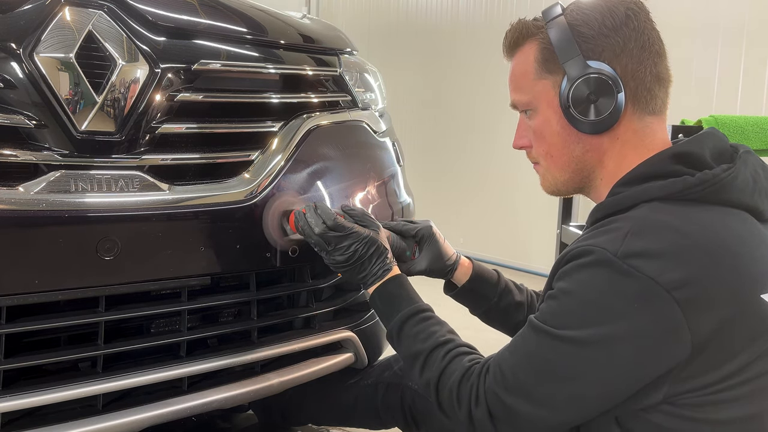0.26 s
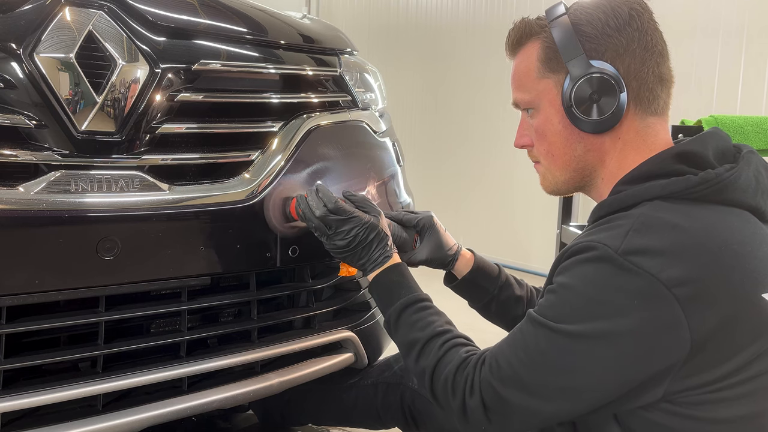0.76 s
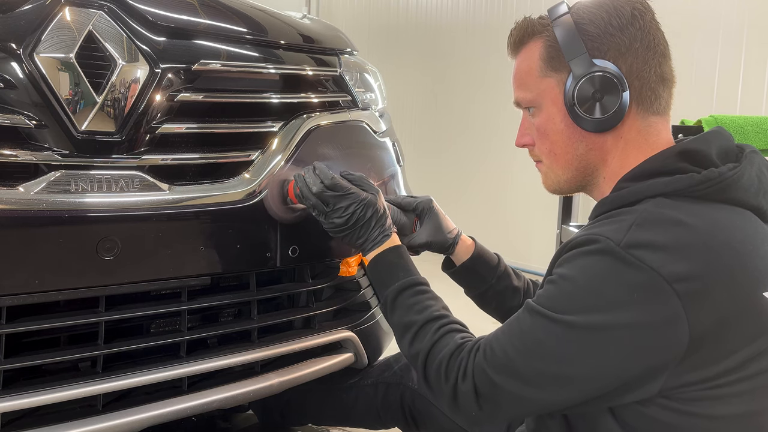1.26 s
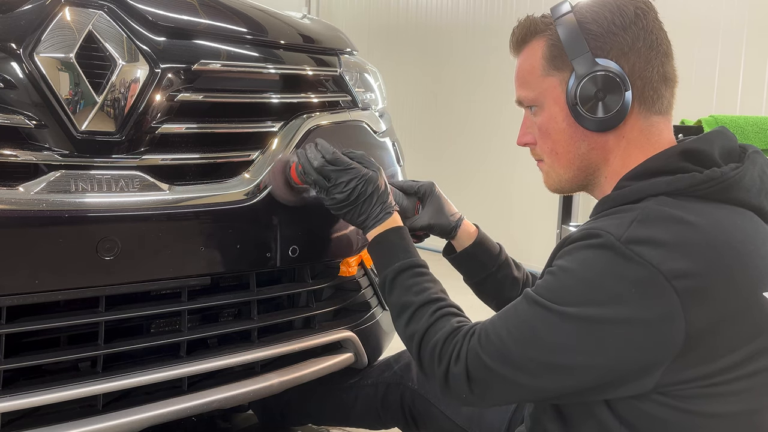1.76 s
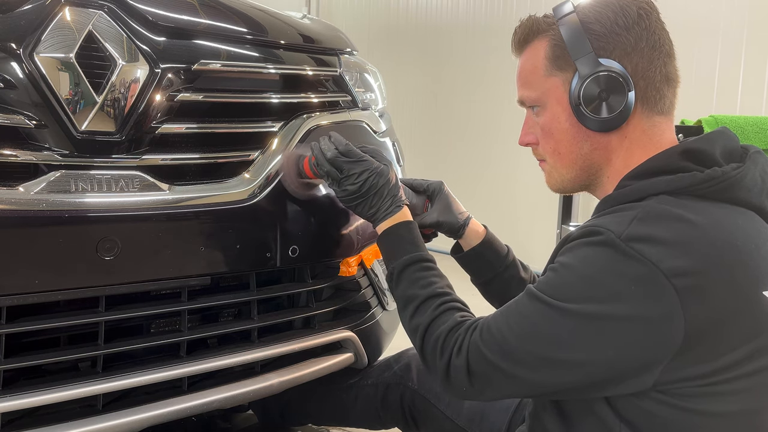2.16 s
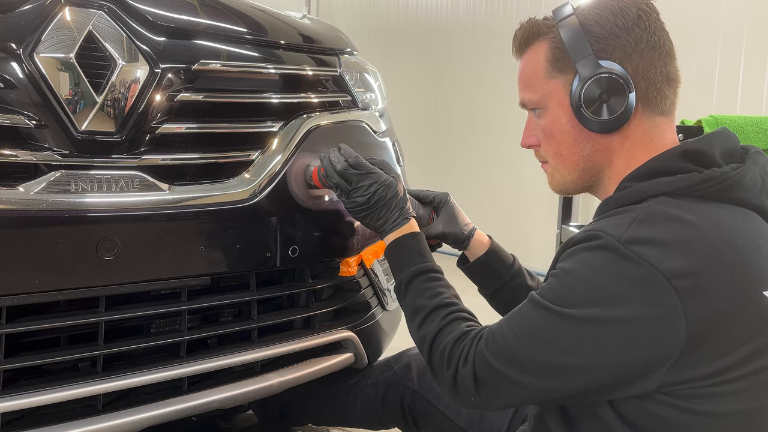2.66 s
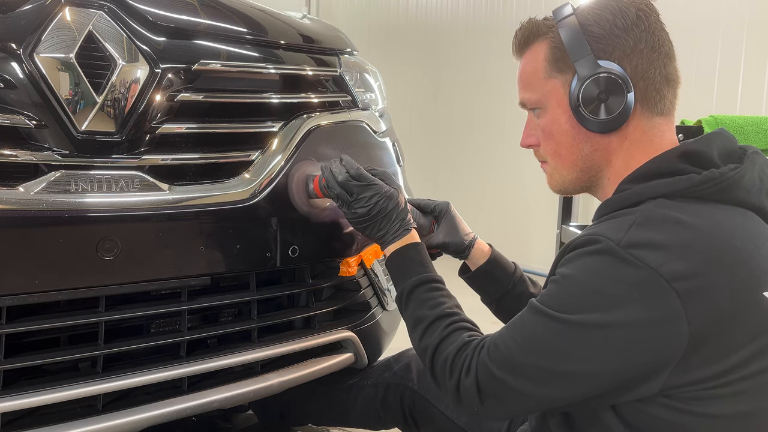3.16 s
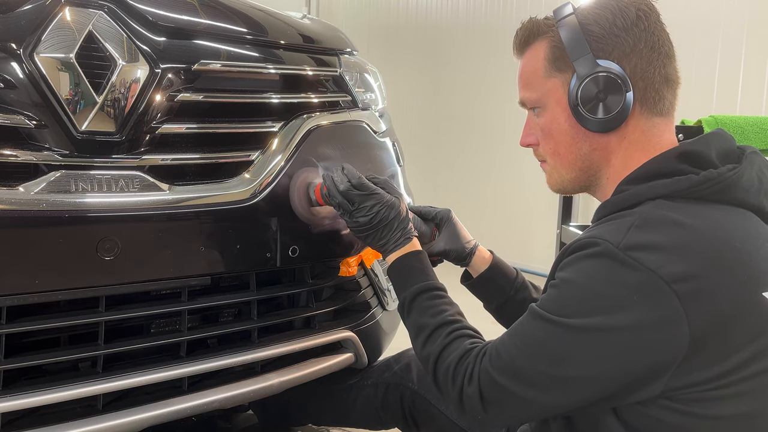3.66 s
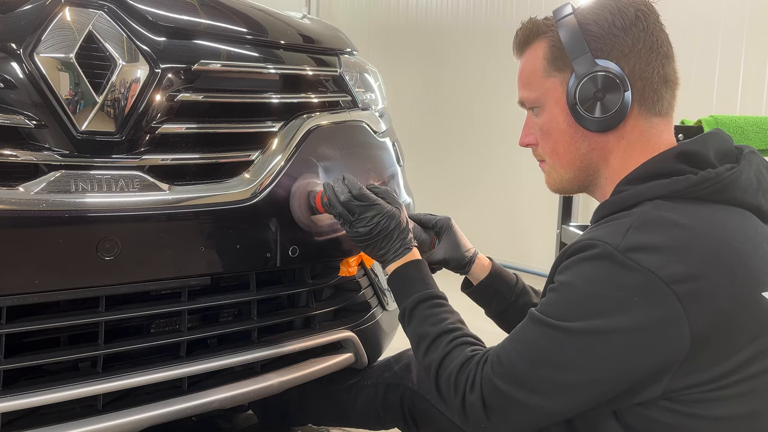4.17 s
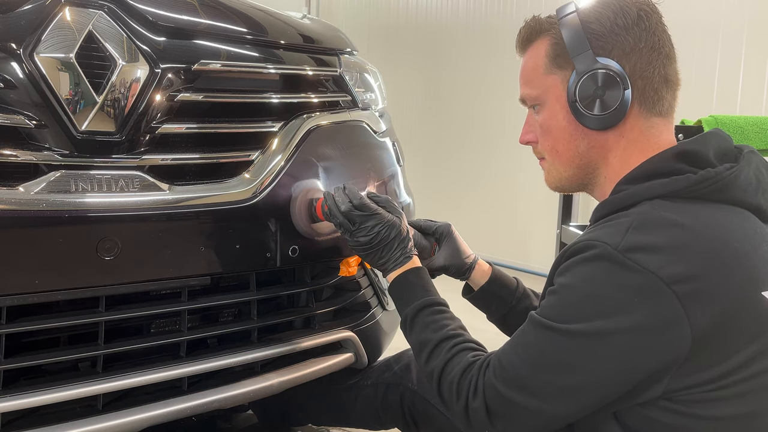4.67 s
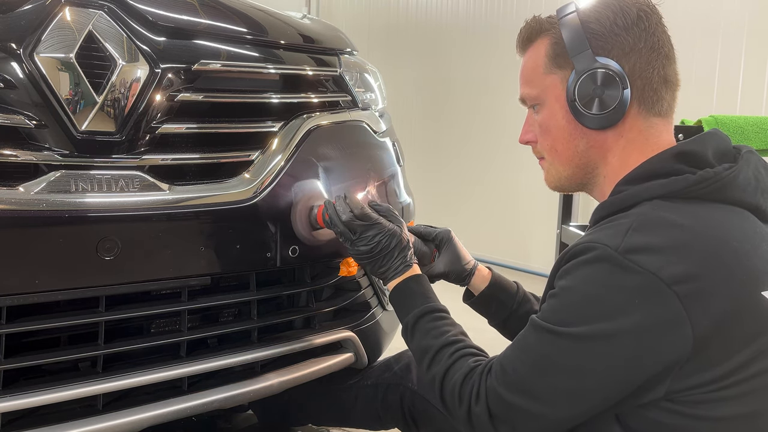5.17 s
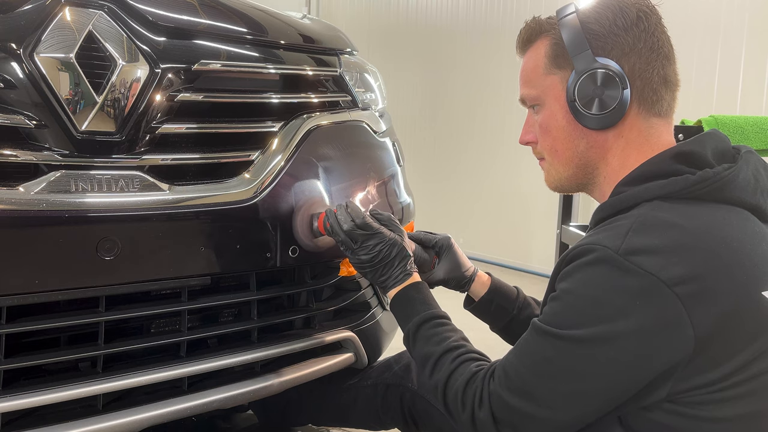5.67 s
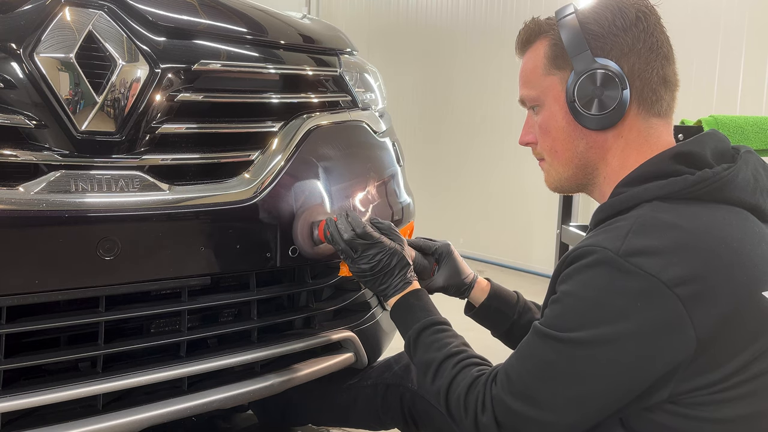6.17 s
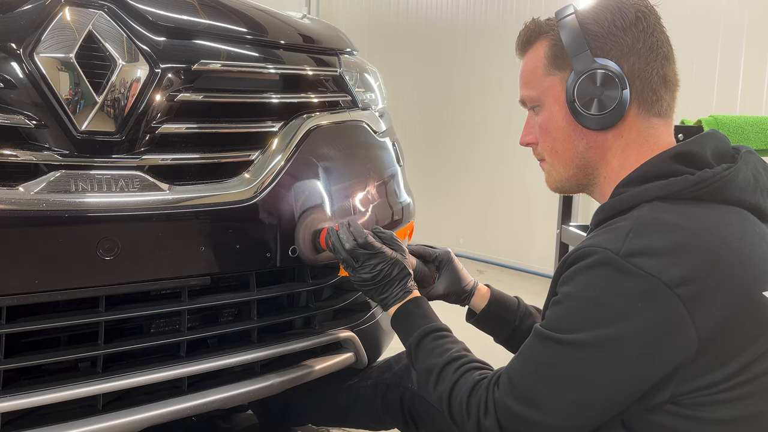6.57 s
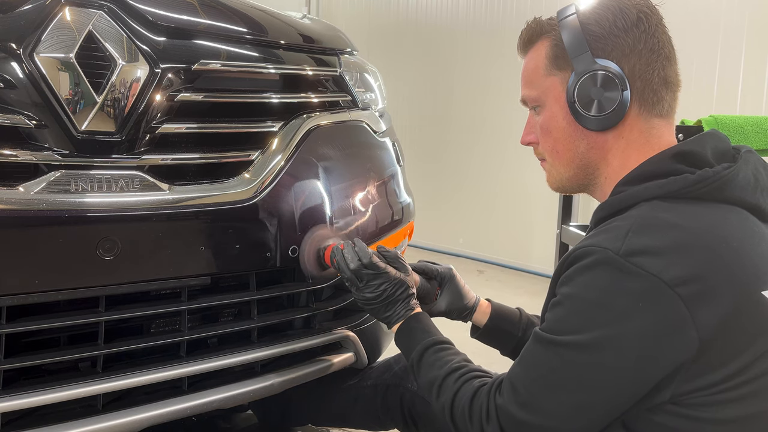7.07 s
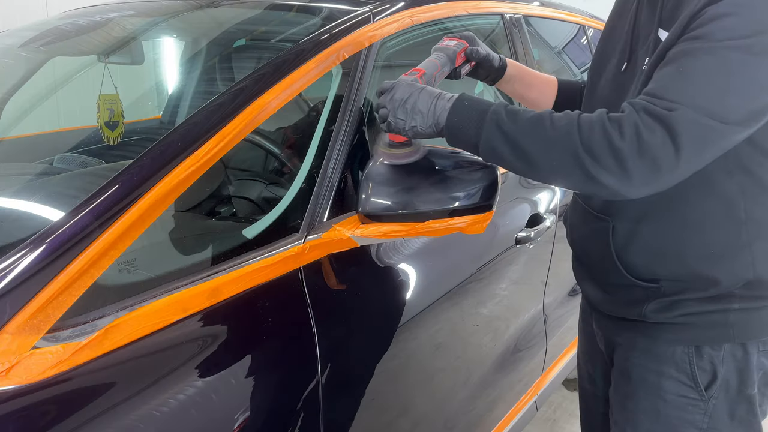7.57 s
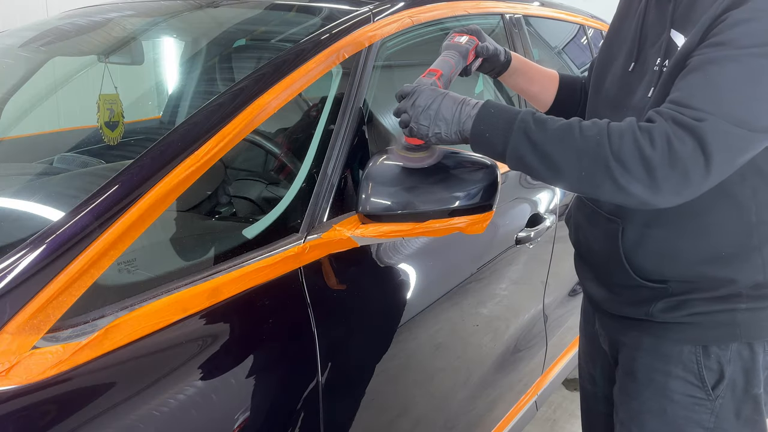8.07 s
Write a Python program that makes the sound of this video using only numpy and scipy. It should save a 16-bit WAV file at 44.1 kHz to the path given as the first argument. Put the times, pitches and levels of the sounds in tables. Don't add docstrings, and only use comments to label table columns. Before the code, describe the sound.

A small geared polisher is already running at 0 s, close to a single microphone in a garage. Its orbiting pad drums the car bumper fast enough to make a steady low hum near 87 Hz, with buzzy harmonics. Over it lie a fuzzy whine near 3.3 kHz, grainy gear growl, housing rattle, soft foam rubbing and bright fan hiss. Pitch stays almost constant with tiny jitters. The whine is strong around 1 s; from 1 to 1.8 s the low hum drops away and the whine thins too. The hum partly returns by 2.6 s, while the whine flickers and stumbles through 3.5 s. From about 4 s the bass builds, fullest around 7 s. At 7.25-7.4 s a quick crossfade moves to a mirror cap: farther, thinner, quieter, slightly lower in pitch, still running at the end, 8.3 s.

```python
import sys
import numpy as np
from scipy import signal
from scipy.io import wavfile
from scipy.ndimage import uniform_filter1d

SR = 44100
rng = np.random.default_rng(int(sys.argv[2]) if len(sys.argv) > 2 else 0)


def gain_from_decibels(decibels):
    exponent = np.asarray(decibels, float) / 20
    return 10 ** exponent


def int16_out(signal):
    q = np.round(np.clip(np.atleast_2d(signal).T, -1, 1) * 32767)
    wavfile.write(sys.argv[1], SR, q.astype(np.int16))


N = 367353

WHEEL_TEETH, PINION_TEETH = 25, 8
SHAFT_PER_ORBIT = WHEEL_TEETH / PINION_TEETH
WHINE_ORDER = 37.5

# [begin_s, end_s]
PLACE_FADE = (7.235, 7.43)
# [time_s, whine_hz]
MOTOR_SPEED = [(0, 3262), (.28, 3263), (.65, 3279), (1.05, 3287), (1.43, 3272), (1.75, 3284), (2.22, 3286),
               (2.62, 3276), (2.95, 3284), (3.35, 3277), (3.9, 3291), (4.7, 3291), (5.2, 3281),
               (5.85, 3291), (7.28, 3274), (7.42, 3240), (7.95, 3214), (8.33, 3220)]
# [centre_s, half_width_s, whine_shift_hz]
SPEED_SURGES = [
    (.6, .06, 3),
    (1.0, 0.047, 8),
    (1.8, 0.048, 10),
    (4.7, 0.077, 5),
    (5.3, .08, -3),
    (5.65, .2, 3),
    (6.7, 0.078, -5),
]

# [time_s, level_db]
DRUMMING = [(0, -42.5), (.5, -43), (.9, -46.5), (1.45, -53), (1.8, -63.5), (2.1, -61.5), (2.6, -55),
            (3.1, -54), (4.6, -46.5), (6, -43), (6.85, -40), (7.24, -39.5)]
# [bumper_db, lean_db_per_drumming_db, cap_db]
NOISE_LEVELS = [
    (-61.5, 0.05, -66.5),
    (-53, -0.0348, -58),
    (-51, 0.09, -54.5),
    (-61.5, 0.05, -66),
]
# [frequency_hz, level_db]
RUB_SPECTRA = [
    [(12, -36), (60, -26), (130, -25), (220, -16), (270, -10), (420, -7), (560, -7.5), (700, -10), (1000, -11), (1400, -18), (2200, -56)],
    [(12, -30), (60, -22.5), (130, -20), (220, -14), (300, -15), (430, -11), (750, -11), (1000, -8.5), (1400, -10), (2200, -54)],
]
GROWL_SPECTRA = [
    [(410, -22), (700, -7), (775, -12), (999, -17.5), (1750, -7), (1880, -6.5), (3140, -3), (3200, -8), (4160, -24), (7040, -120)],
    [(410, -55), (700, -22), (974, -26), (999, -19), (1580, -4.5), (2100, -4.5), (2890, -16), (3200, -3), (4160, -18), (7040, -120)],
]
RATTLE_SPECTRA = [
    [(1820, -20), (3100, -29), (3170, -8), (3400, -4), (3440, -4.5), (3770, -9.5), (4650, -8), (5950, -15.5), (6630, -16.5), (7800, -24.5), (10100, -44), (17200, -120)],
    [(1820, -26), (3100, -9), (3340, -6), (3390, -8), (3880, -10.5), (5340, -10.5), (5640, -14), (6510, -14.5), (7300, -22), (7800, -15.5), (10100, -49), (17200, -120)],
]
HISS_SPECTRA = [
    [(4350, -59), (7400, -6), (8600, -2), (10400, -8), (12000, -6.5), (13200, -13), (15600, -13.5)],
    [(4350, -37), (7400, -10.5), (8600, -8), (10500, -7), (12000, -12), (13500, -15), (15600, -18)],
]

# [orbit_multiple, direct_bumper_db, cap_db]
STRONG_ORDERS = [(2, -53.5, -72), (3, -59, -68.5), (4, -69, -68), (5, -60.5, -66.5), (6, -65.5, -72),
                 (7, -66.5, -74), (9, -71.5, -88), (10, -70.5, -79), (11, -67.5, -85), (12, -75.5, -80),
                 (14, -75, -81)]
# [orbit_multiple, direct_bumper_db, cap_db]
WEAK_ORDERS = [(8, -70.8, -77.0), (13, -78.8, -78.2), (15, -72.5, -80.3), (16, -73.6, -73.7),
               (17, -75.4, -74.3), (18, -71.7, -71.0), (19, -73.6, -70.1), (20, -76.2, -77.6),
               (21, -76.5, -73.7), (22, -74.1, -68.6), (23, -76.1, -73.6), (24, -71.8, -72.4),
               (26, -75.0, -73.5), (27, -71.9, -79.3), (28, -73.9, -81.7), (29, -77.1, -84.7),
               (30, -75.1, -87.3), (31, -75.3, -76.2)]
PHASE_SPREAD = .13, .024
# [orbit_multiple, share_of_direct, seconds_per_phase_turn, in_step_s]
PANEL_ECHOES = [(2, 0.15, 2.54, 3.5), (2, 0.22, 5.6, 3.5), (3, 0.51, 18.6, 10.5), (3, 0.28, 3.5, 1.5),
                (4, 0.93, 11, 6.5), (4, 0.93, 3.1, 3), (5, 0.33, 8, 5), (5, 0.29, 2.94, 2),
                (6, 1.25, 4, 3.5), (6, 1.55, 4.62, 1.4), (7, 0.58, 1.48, 14), (7, 0.23, 9.7, 2.5),
                (9, 1.35, 5.2, 5), (9, 1.4, 4.14, 2.5), (10, 1.45, 28, 16.5), (11, 0.72, 32, -10.5),
                (12, 0.7, 4.9, 1.8), (14, 0.59, 3.1, 2.5), (14, 0.65, 4.1, 0.64), (25, 0.63, 26.4, 17.5),
                (62.5, .3, 2.1, 3.5), (75, 0.69, 2.74, 0), (100, 0.22, 3.1, 4), (100, 0.36, 1.62, -2),
                (8, 0.66, 16.0, 12.1), (13, 0.29, 1.69, 0.6), (15, 0.55, 16.0, 13.21),
               (16, 0.39, 4.76, 4.48), (17, 0.69, 4.44, 0.56), (18, 0.8, 16.0, 11.45),
               (19, 0.44, 3.78, 0.83), (20, 0.82, 16.0, 12.38), (21, 0.6, 5.69, 1.91),
               (22, 1.0, 13.82, 4.53), (23, 0.53, 5.47, 0.1), (24, 0.37, 2.37, 0.66), (26, 0.5, 6.95, 2.11),
               (27, 0.55, 5.15, 2.93), (28, 0.64, 11.23, 1.75), (29, 0.67, 6.75, 5.48),
               (30, 0.63, 1.42, 0.62), (31, 0.59, 4.53, 1.5)]
# [orbit_multiple, centre_s, half_width_s, level_db]
ORDER_SWELLS = [(2, 7.035, 0.071, -15), (4, .9, 0.17, 4), (4, 1.9, .12, -15), (4, 3.3, 0.44, -7),
                (4, 4.4, .35, 1), (4, 5.05, 0.12, -13), (4, 7.02, .12, -12), (4, 15, 0.22, 9),
                (6, 1.5, 0.25, -5), (6, 7.37, 0.06, -16), (7, 0.58, 0.38, -16), (3, .1, 0.72, -3),
                (2, 7, 0.25, -1), (14, .1, 0.37, 3), (15, .1, 0.32, 7), (17, .5, 0.46, 0.5),
                (6, 2.3, 0.4, -3), (6, 5, 0.27, 0), (22, 3.4, 2.2, 1.5), (75, 0.61, .5, -9),
                (75, 3.7, .3, -6), (8, 0.56, 0.55, 2.5), (8, 6.8, .8, -4), (18, 0.43, 0.61, 6.5),
                (19, 4.2, .8, 5), (18, 6.2, 0.63, 2), (18, 8.3, .4, 4), (3, 3.33, 0.25, -15),
                (3, 2.16, 0.23, 4), (4, 1.3, 0.13, -12), (5, 0.98, 0.37, 4), (6, .1, 0.19, -2),
                (6, 0.72, 0.35, 4.5), (6, 4.25, 0.66, 6), (9, 1.8, .6, -5), (9, 3.6, 0.14, -6),
                (10, 0.46, 0.65, -9), (10, 1.9, 0.24, -15.5), (10, 2.6, 0.98, -11), (14, 2.6, 2.1, -5.5),
                (11, 5.2, .3, 8), (25, 4.4, 0.71, -4), (25, 6.9, 0.38, 5), (75, 7.11, .4, -5),
                (75, 5.7, .4, -5), (100, 7.0, 0.17, 5), (100, 4.9, .25, -9), (12, 7.81, 0.37, 2),
                (62.5, 5, 0.17, 6), (100, 3.7, 0.35, 9),
                (37.5, 1.29, 0.043, -7), (37.5, 1.35, .03, 5.5), (37.5, 2.5, .06, -7),
               (37.5, 2.79, .035, -10), (37.5, 3.19, 0.061, -13), (37.5, 3.375, .025, -9),
               (37.5, 3.435, .015, 7), (37.5, 3.47, .015, -8), (37.5, 3.8, 0.045, 6), (37.5, 3.92, .04, 0),
               (37.5, 4.53, 0.023, -3), (37.5, 4.72, 0.039, -8), (37.5, 5.05, 0.046, -7),
               (37.5, 5.2, 0.029, 5), (37.5, 5.3, .06, -4), (37.5, 0.5, .07, -4), (37.5, 6.2, 0.018, -2),
               (37.5, 6.99, 0.045, -6), (37.5, 7.5, .1, -1.5), (5, 7.36, .07, -5), (37.5, 7.39, .06, -13),
               (37.5, 8.05, .04, -5)]

# [time_s, pad_turns_per_orbit]
PAD_SPIN = [
    (0, .15),
    (1.3, .16),
    (2.3, .176),
    (4, .182),
    (8.33, .184),
]
SIDE_TONES = [(1, 1), (1, -1), (2, 1), (3, 4), (3, 2), (3, 1), (4, 4), (4, 2), (5, 6), (5, 4), (5, 2),
              (5, 1), (6, 4), (6, 2), (7, 4), (7, 2), (8, 4), (8, 2), (9, 2), (10, 4), (9.58, 0),
              (1.125, 0), (2.125, 0), (3.125, 0), (3.875, 0), (4.125, 0), (5.125, 0), (5.875, 0),
              (6.125, 0), (7.125, 0), (8.125, 0), (9.125, 0), (10.125, 0)]
SIDE_TIMES = (.6, 3.8, 6.3)
# [early_db, middle_db, late_db, cap_db]
SIDE_LEVELS = [(-77, -78.5, -87, -92), (-84, -84, -88, -88), (-83, -85, -81, -81), (-90, -88, -90, -83),
               (-88, -84, -90, -82), (-79, -77, -79, -90), (-75, -74, -77, -90), (-69, -68.5, -69, -92),
               (-85, -76.5, -69, -90), (-75, -71.5, -71, -79), (-87, -68, -71.5, -72.5),
               (-90, -78, -85, -82), (-79, -74, -75, -83), (-80, -79, -70, -91), (-82, -79, -79, -90),
               (-85, -81, -77, -88), (-80, -78, -75, -88), (-83, -81, -77, -88), (-81, -80, -78, -88),
               (-85, -82, -77, -90), (-79, -80, -74, -90), (-84, -86, -88, -90), (-83, -85, -86, -86),
               (-67, -64, -72, -91), (-78, -85, -83, -90), (-71.5, -75, -88, -77), (-82, -76, -80, -72),
               (-77, -80, -87, -93), (-66.5, -74.5, -76, -88), (-71, -70, -84, -88), (-82, -78, -83, -88),
               (-84, -76, -80, -88), (-91, -77, -69, -78)]

# [time_s, whine_db]
WHINE_LEVEL = [(0, -51), (.65, -47), (1.1, -48), (1.42, -53), (1.75, -60.5), (2.27, -52.5), (2.7, -59.5),
               (3.0, -54.5), (3.5, -53), (4.05, -53), (4.45, -48.5), (5.0, -52.5), (5.4, -53),
               (6.88, -50.5), (7.02, -54), (7.38, -55), (7.55, -57.5), (8.33, -57.5)]
SLOT_MULTIPLES = [8, 20, 23, 24, 25, 32, 34, 35, 39, 43, 44]
# [shaft_multiple, direct_bumper_db, cap_db]
SLOT_LEVELS = [(8, -64, -69.5), (20, -75.5, -72), (23, -78.5, -82), (24, -73.5, -81), (25, -77, -81),
               (32, -74.5, -87), (34, -75.5, -78), (35, -81, -84), (39, -76.5, -80), (43, -79, -83),
               (44, -85, -82)]

# [time_s, tilt_db, ring_hz]
HEAD_TILT = [(0, 1, 8300), (.5, 0, 8850), (1.3, 0, 8530), (1.8, 3, 8630), (2.65, 1, 8750), (3.1, -1, 8790),
             (3.55, 4, 8720), (4.1, 7, 8700), (4.7, 1, 8450), (5.3, 0, 8560), (5.8, 5.5, 8780),
             (6.6, -1, 8450), (7.0, 2, 8800), (7.4, 0, 8660), (7.6, 6, 8650), (7.8, 0, 8570),
             (8.33, 2, 8580)]
# [bumper_db, cap_db]
HEAD_RING_LEVELS = (-56.5, -58.5)
# [time_s, level_db, resonance_hz]
VENT_COVER = [(0, -65, 10300), (1, -64, 10400), (1.6, -62, 10500), (2.2, -65, 10500), (2.5, -62, 10200),
              (3.3, -62, 10220), (4.05, -60, 10600), (4.35, -61, 10500), (4.55, -62, 10100),
              (5, -62, 10200), (5.25, -65, 10500), (6.2, -64, 10000), (6.6, -69, 10210), (7.2, -66, 10400),
              (7.4, -71, 10280), (7.9, -70, 10300), (8.05, -65, 10300), (8.33, -68, 10290)]
# [resonance_hz, width_hz, level_db, slope_db_per_s]
HOUSING_RASPS = [
    (4500, 900, -60, -6),
    (1610, 400, -63, -8.5),
]
# [resonance_hz, width_hz, bumper_db, cap_db, loudest_s]
BEARING_MODES = [
    (2110, 1400, -66.5, -71, 2.07),
    (4027, 700, -61.5, -68, 0.47),
    (5415, 370, -64, -67, 2.8),
    (6510, 720, -68.5, -73, 2.5),
]
BEARING_SCRAPE = (.2, .2, 1.6, .4)


def evened(x):
    return x / np.sqrt(np.mean(x ** 2) + 1e-20)


def columns(rows, t):
    s, *values = np.transpose(rows)
    return [np.interp(t, s, v) for v in values]


def read(points, hz):
    f, value = np.transpose(points)
    return np.interp(np.log(hz + 1), np.log(f + 1), value, -120, -120)


def wander(per_s, count=1):
    steps = np.arange(0, N + 256, 256)
    hz = np.geomspace(per_s / 8, per_s, 16)
    phase = rng.random((count, len(hz)))
    waves = np.sin(2 * np.pi * (hz * steps[:, None, None] / SR + phase))
    drifts = np.array([np.interp(np.arange(N), steps, w) for w in waves.sum(2).T])
    return drifts / np.sqrt(len(hz) / 2)


def far(t):
    return np.interp(t, PLACE_FADE, [0, 1])


def blend(near_db, far_db, t):
    return 20 * np.log10(gain_from_decibels(near_db) * (1 - far(t)) + gain_from_decibels(far_db) * far(t) + 1e-9)


def work_db(t):
    lean_db = columns(DRUMMING, t)[0] + 48
    dip_db = -4 * np.exp(-((t - 7.36) / 0.072) ** 2)
    lead_s = .005
    return [blend(near_db + per_db * lean_db, far_db, t + lead_s) + dip_db
            for near_db, per_db, far_db in NOISE_LEVELS]


def travel_db(order, t):
    slow = t[::256]
    total = np.ones(len(slow), complex)
    for k, share, turn_s, at_s in PANEL_ECHOES:
        if abs(k - order) < .4:
            total += share * np.exp(2j * np.pi * (slow - at_s) / turn_s)
    return np.interp(t, slow, 20 * np.log10(abs(total) + .03))


def swells_db(order, t):
    return sum(db * np.exp(-((t - s) / width_s) ** 2)
               for k, s, width_s, db in ORDER_SWELLS if abs(k - order) < .4)


def tone(turns, db, start=None):
    steps = np.arange(0, N, 64)
    level = np.interp(np.arange(N), steps, gain_from_decibels(db[steps]))
    start = rng.random() if start is None else start
    angle = 2 * np.pi * ((turns + start) % 1)
    return np.sqrt(2) * level * np.sin(angle.astype(np.float32))


def coloured(drive, spectra, level_db, patchy_db, size):
    hz, t, z = signal.stft(evened(drive), SR, nperseg=1024)
    bumper, cap = [evened(gain_from_decibels(read(s, hz))) for s in spectra]
    patches = rng.standard_normal((len(hz), len(t) // 8 + 1))
    for _ in range(2):
        patches = uniform_filter1d(patches, size=size, axis=0)
        patches = uniform_filter1d(patches, size=7, axis=1)
    patches = np.repeat(evened(patches), 8, axis=1)[:, :len(t)]
    patches = uniform_filter1d(patches, size=8, axis=1)
    body = np.outer(bumper, 1 - far(t)) + np.outer(cap, far(t))
    z = z * body * gain_from_decibels(patchy_db * patches)
    return gain_from_decibels(level_db) * signal.istft(z, SR, nperseg=1024)[1][:N]


def resonate(x, hz, width_hz):
    turn = np.exp(2j * np.pi * np.cumsum(hz) / SR)
    r = np.exp(-np.pi * width_hz / SR)
    smooth = signal.lfilter([1], np.convolve([1, -r], [1, -r]), x / turn)
    return evened((turn * smooth).real)


def scrape(orbit, orbit_db, shaft_db, sharp):
    swing = (.5 + .5 * np.cos(2 * np.pi * orbit)) ** np.clip(sharp, 1, 12)
    shaft = np.cos(2 * np.pi * orbit * WHEEL_TEETH / PINION_TEETH)
    return gain_from_decibels(orbit_db * swing + shaft_db * shaft) * rng.standard_normal(N)


def hunting(orbit, depth_db):
    return gain_from_decibels(depth_db * np.cos(2 * np.pi * orbit / PINION_TEETH))


def clicks(turns):
    at = np.flatnonzero(np.diff(np.floor(turns))) + 1
    late = (turns[at] % 1) / (turns[at] - turns[at - 1])

    def place(size):
        near, out = np.arange(-8, 9), np.zeros(N + 16)
        pulse = np.sinc(near + late[:, None]) * np.hanning(19)[1:-1]
        np.add.at(out, at[:, None] + near + 8, size[:, None] * pulse)
        return evened(out[8:N + 8])
    return at, place


def beat(turns, loose_db):
    at, place = clicks(turns)
    return place(gain_from_decibels(loose_db * rng.standard_normal(N)[at]))


def teeth(orbit, wheel_db, pinion_db, loose_db):
    contact = orbit * WHEEL_TEETH
    at, place = clicks(contact)
    k = np.floor(contact[at]).astype(int)
    wheel, pinion = rng.standard_normal(WHEEL_TEETH), rng.standard_normal(PINION_TEETH)
    wheel[0], pinion[0] = 3, 2.2
    db = wheel_db * wheel[k % WHEEL_TEETH] + pinion_db * pinion[k % PINION_TEETH]
    size = gain_from_decibels(db + loose_db * rng.standard_normal(N)[at])
    return place(size - 1.02 * size.mean())


def slot_levels(t):
    levels = []
    for k, (_, near_db, far_db) in zip(SLOT_MULTIPLES, SLOT_LEVELS):
        order = k * SHAFT_PER_ORBIT
        levels.append(blend(near_db + travel_db(order, t) + swells_db(order, t), far_db, t))
    return levels


def fan(orbit, t):
    shaft = orbit * WHEEL_TEETH / PINION_TEETH
    air = scrape(orbit, orbit_db=3.2, shaft_db=.8, sharp=1.7) * hunting(orbit, 0.7)
    air = evened(air) + 0.09 * beat(shaft, loose_db=0.5)
    slot_db = slot_levels(t)[1]
    chop = resonate(air, 20 * np.gradient(shaft) * SR, width_hz=690)
    chop = chop * gain_from_decibels(0.54 * (slot_db + 71.0) - 71.0)
    return chop + coloured(air, HISS_SPECTRA, work_db(t)[3] + 4.0, patchy_db=.8, size=14)


def motor(orbit, t):
    slip, grain = wander(45, count=2)
    flutter = wander(22)[0]
    whine_db = columns(WHINE_LEVEL, t)[0] + swells_db(WHINE_ORDER, t)
    weak_db = np.clip(-52 - whine_db, 0, 10) * (1 - far(t))
    whine_db = whine_db - 2 - .4 * weak_db + (.9 + .1 * weak_db) * flutter
    whine = tone(WHINE_ORDER * orbit + .006 * slip, whine_db)
    whine = whine * (1 + 0.15 * np.cos(2 * np.pi * orbit))
    shaft = orbit * WHEEL_TEETH / PINION_TEETH
    drifts = wander(1.32, count=len(SLOT_MULTIPLES))
    slots = sum(tone(k * shaft + 0.029 * slip, db + 2.8 * grain + 1.6 * d)
                for k, db, d in zip(SLOT_MULTIPLES, slot_levels(t), drifts))
    return whine + slots


def bearing(orbit, t):
    chatter = rng.standard_normal((len(BEARING_MODES), 330)) * np.hanning(330)
    hiss = rng.standard_normal(N)
    total = np.zeros(N)
    for (hz, width_hz, near_db, far_db, at_s), c, share in zip(BEARING_MODES, chatter, BEARING_SCRAPE):
        grip_db = 2 * np.cos(2 * np.pi * (t - at_s) / 5.2)
        drive = evened(signal.oaconvolve(beat(orbit, loose_db=3.0), c)[:N]) + share * hiss
        total += gain_from_decibels(blend(near_db + grip_db, far_db, t)) * resonate(drive, hz + 0 * t, width_hz)
    return total


def gears(orbit, t):
    _, growl_db, rattle_db, _ = work_db(t)
    tilt_db, head_hz = columns(HEAD_TILT, t)
    head_db = blend(*HEAD_RING_LEVELS, t) + tilt_db
    vent_db, vent_hz = columns(VENT_COVER, t)
    worn, knocks = teeth(orbit, 2.9, 2.4, 1.4), teeth(orbit, 4.3, 1.9, .6)

    growl = evened(scrape(orbit + .5, orbit_db=2.2, shaft_db=-1.0, sharp=3.7)) + 0.4 * worn
    growl = growl * hunting(orbit, 0.19)
    rattle = evened(scrape(orbit, orbit_db=2.5, shaft_db=0.5, sharp=1.5)) + 0.18 * worn
    ring = evened(scrape(orbit, orbit_db=4.6, shaft_db=2.9, sharp=3.1))
    ring = (ring + .9 * knocks + .8 * beat(orbit, 2.5)) * hunting(orbit, .8)
    vent = evened(scrape(orbit, orbit_db=1.8, shaft_db=0.8, sharp=3.2))
    vent = (vent + 0.2 * knocks) * hunting(orbit, 0.45)

    housing = coloured(growl, GROWL_SPECTRA, growl_db - .3, patchy_db=0.9, size=3)
    housing = housing + coloured(rattle, RATTLE_SPECTRA, rattle_db - .3, patchy_db=.8, size=3)
    rasp = sum(gain_from_decibels(db + per_s * t) * resonate(rattle, hz + 0 * t, width_hz)
               for hz, width_hz, db, per_s in HOUSING_RASPS)
    head = gain_from_decibels(head_db - 7.0) * resonate(ring, head_hz, width_hz=560)
    cover = gain_from_decibels(vent_db + 1.0) * resonate(vent, vent_hz, width_hz=970)
    return housing + rasp + head + cover


def rub(orbit, t):
    friction = scrape(orbit, orbit_db=5.0, shaft_db=-0.5, sharp=1.6)
    return coloured(friction, RUB_SPECTRA, work_db(t)[0] - 0.4, patchy_db=2.0, size=2)


def side_tones(orbit, t):
    drifts = 1.6 * wander(1.575, count=len(SIDE_LEVELS))
    spin = np.cumsum(columns(PAD_SPIN, t)[0] * np.gradient(orbit))
    gone = far(t)
    fall_db = 12 * np.clip(t - 6.8, 0, .5)
    total = np.zeros(N)
    for (k, n), (*near, cap_db), d in zip(SIDE_TONES, SIDE_LEVELS, drifts):
        near_db = np.interp(t, SIDE_TIMES, near) - fall_db
        total += tone(k * orbit - n * spin, near_db * (1 - gone) + cap_db * gone + d)
    return total


def pad(orbit, t):
    strong_spread, weak_spread = PHASE_SPREAD
    total = tone(orbit, blend(columns(DRUMMING, t)[0], -55.5, t), start=0)
    for (k, near_db, far_db), d in zip(STRONG_ORDERS, wander(2.0, count=len(STRONG_ORDERS))):
        level_db = blend(near_db + travel_db(k, t), far_db + 2.2 * d, t) + swells_db(k, t)
        total = total + tone(k * orbit, level_db, strong_spread * k * k)
    drifts = 2.1 * wander(2.5, count=len(WEAK_ORDERS))
    shake_db = 1.7 * wander(30)[0] - .8
    for (k, near_db, far_db), d in zip(WEAK_ORDERS, drifts):
        level_db = blend(near_db + travel_db(k, t), far_db, t) + swells_db(k, t) + d + shake_db
        total = total + tone(k * orbit, level_db, weak_spread * k * k)
    return total + side_tones(orbit, t) + rub(orbit, t)


def scene():
    t = np.arange(N) / SR
    surge_hz = sum(hz * np.exp(-((t - s) / width_s) ** 2) for s, width_s, hz in SPEED_SURGES)
    jitter_hz = 2.1 * wander(12)[0]
    whine_hz = columns(MOTOR_SPEED, t)[0] + surge_hz + jitter_hz
    orbit = np.cumsum(whine_hz) / SR / WHINE_ORDER
    mono = fan(orbit, t) + motor(orbit, t) + bearing(orbit, t) + gears(orbit, t) + pad(orbit, t)
    return np.array([mono, mono])


def top_cut(x):
    return signal.sosfilt(signal.butter(12, 15710, fs=SR, output="sos"), x)


def record(dry):
    return top_cut(dry)


dry = scene()
out = record(dry)
int16_out(out)
```